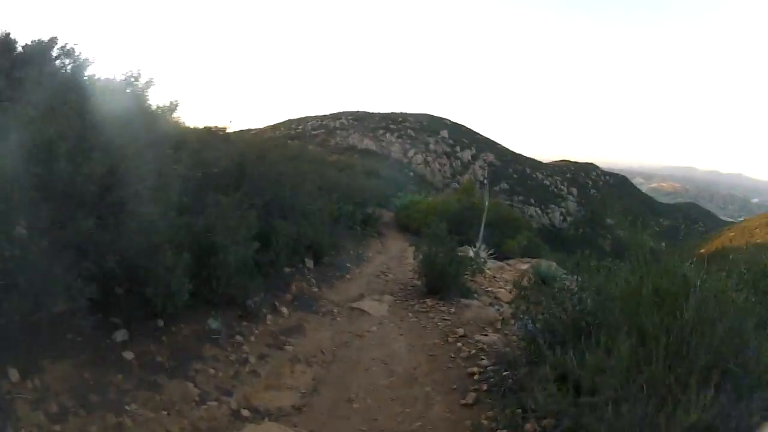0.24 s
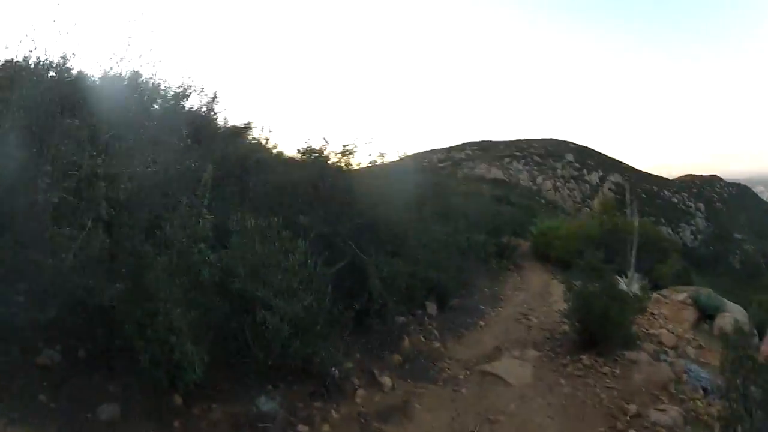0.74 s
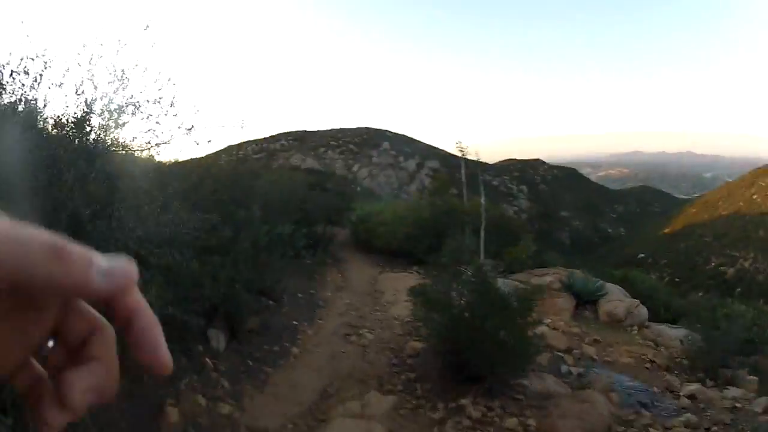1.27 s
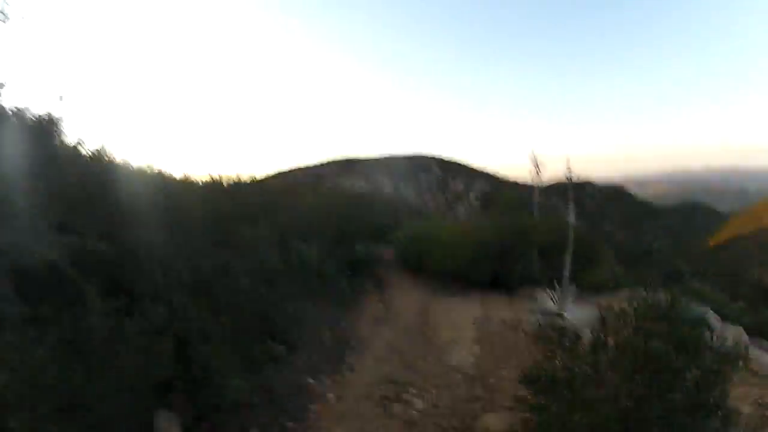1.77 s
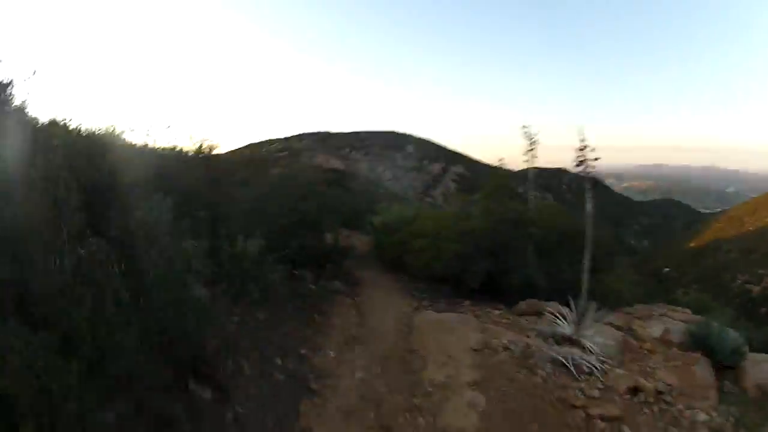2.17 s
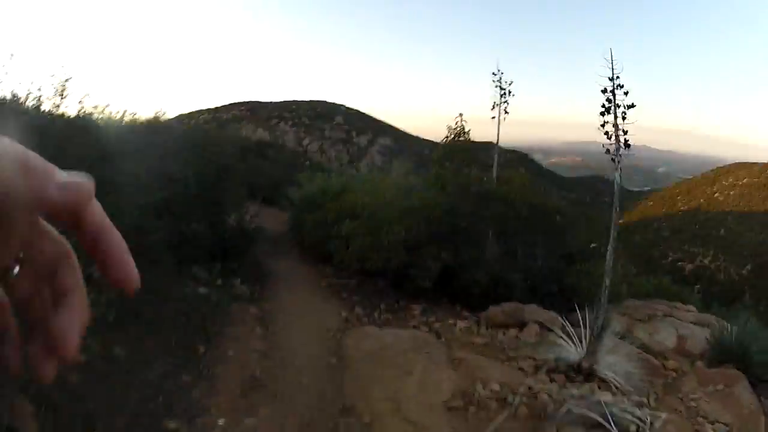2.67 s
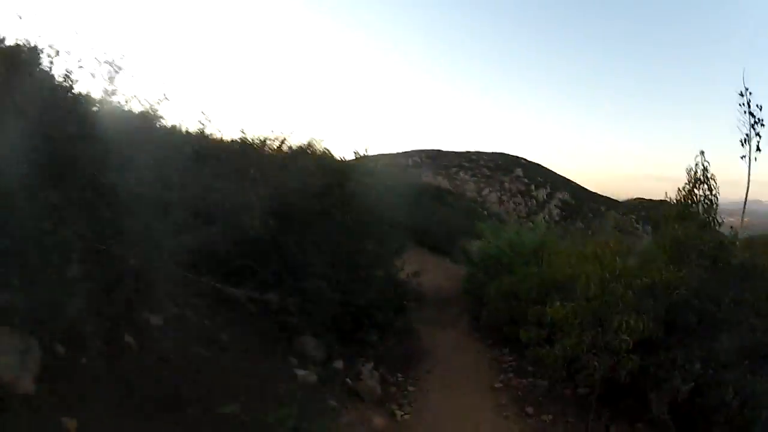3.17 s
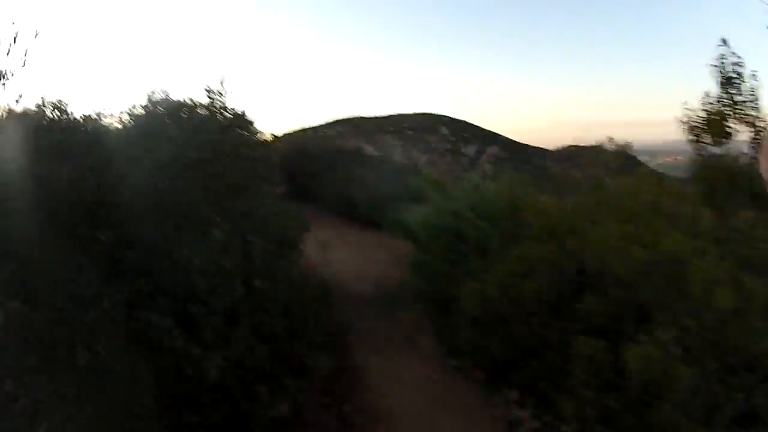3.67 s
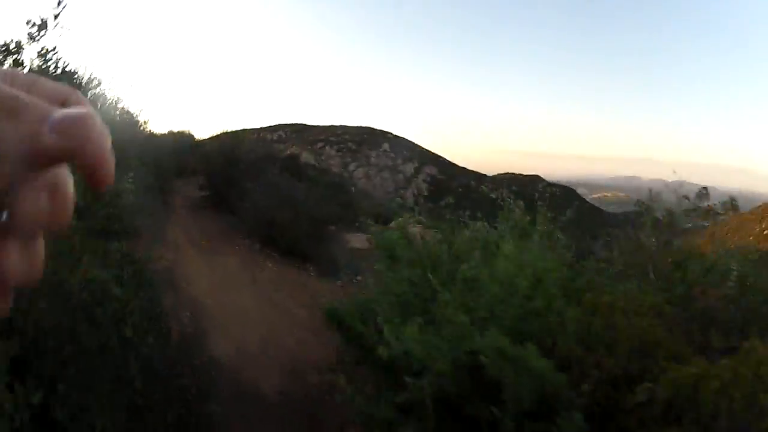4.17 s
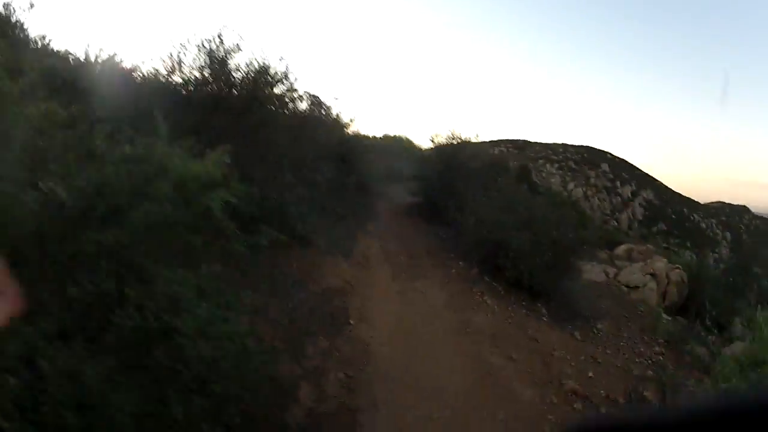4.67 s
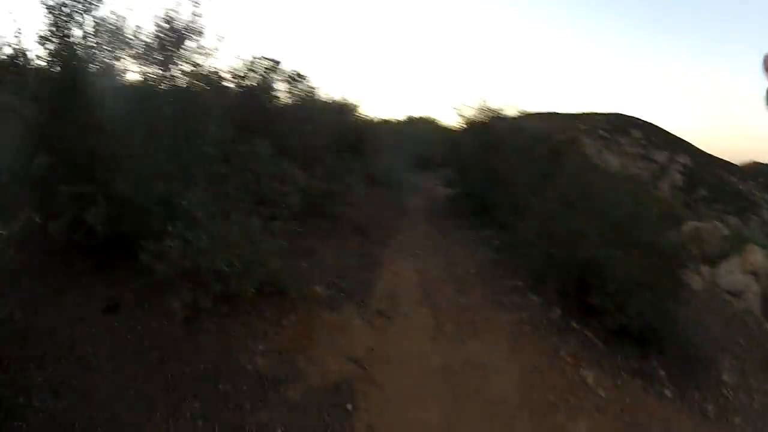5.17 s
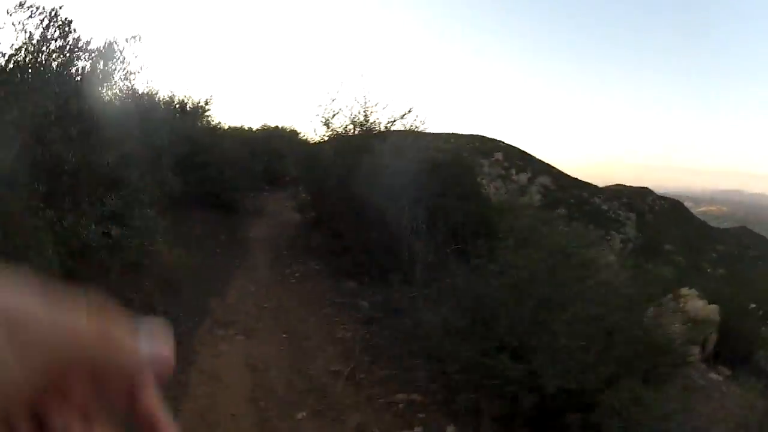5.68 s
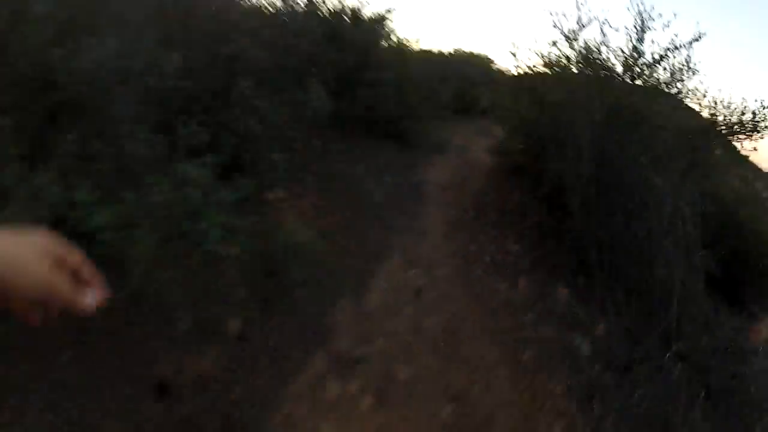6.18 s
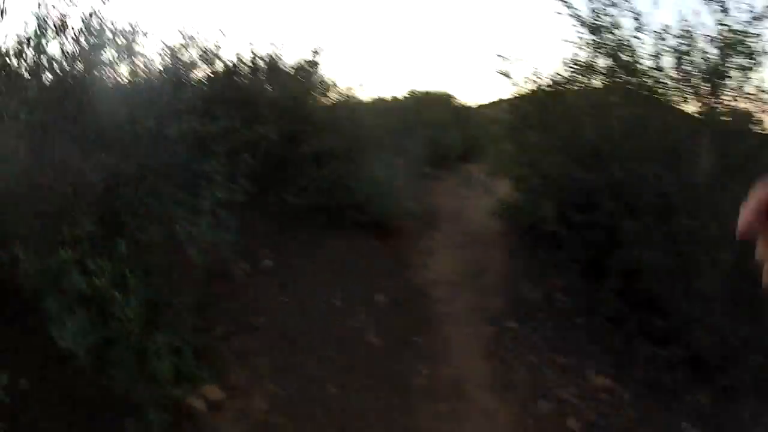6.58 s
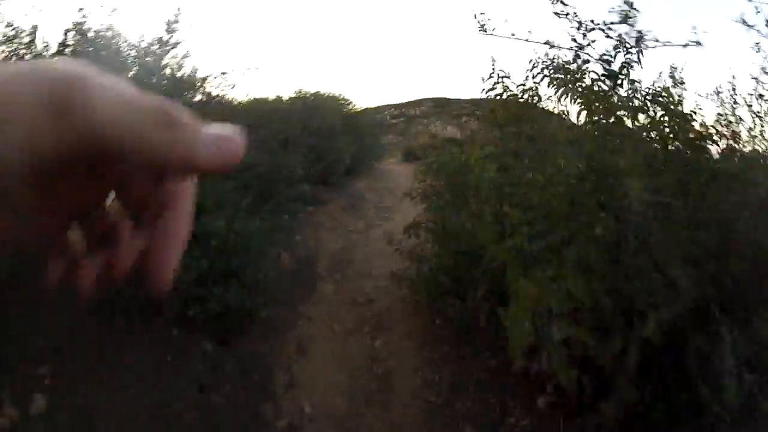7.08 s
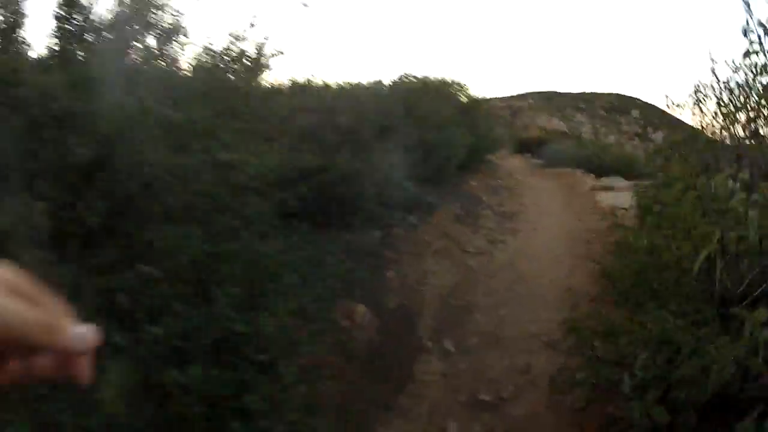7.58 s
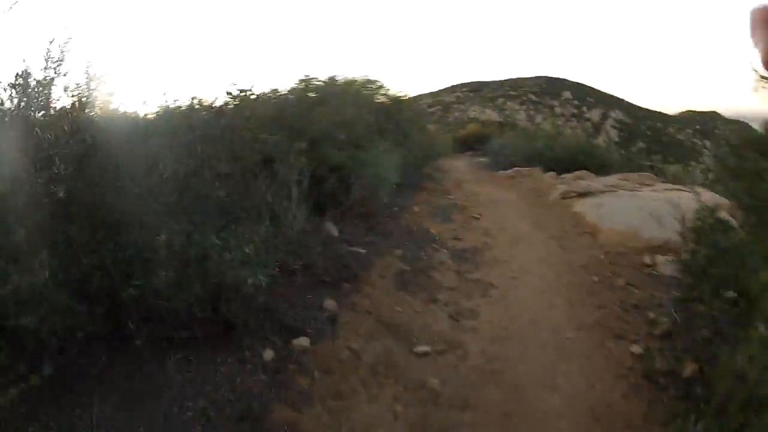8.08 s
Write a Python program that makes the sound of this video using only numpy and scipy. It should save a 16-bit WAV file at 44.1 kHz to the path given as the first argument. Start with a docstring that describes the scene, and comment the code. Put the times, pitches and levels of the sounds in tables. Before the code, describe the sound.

A person runs on a dirt trail, heard very close from a chest-worn camera in a plastic case. From the start, dull footfalls thud at nearly three a second over a low rumble of moving air. Small kicked stones chink with most steps, and a shirt scrapes over the case in short hissing strokes, squeaking faintly around 0.6 seconds. At about 1.1 seconds the case knocks hard, followed by a heavy, slightly overloaded bump against the chest. Another bump comes at 2.6 seconds, and a knock and bump near 3.3. From 4.5 seconds the steps soften, and sharp plastic knocks land at about 4.7, 5.8, 6.2 and 7.6 seconds. The shirt squeaks briefly on about every second step, near 5.2, 6, 6.7, 7.4 and 8.1 seconds. The running continues to the end, just past 8 seconds, with a coarse, gritty sound throughout.

```python
"""A runner on a dirt trail, heard by a camera worn on the chest in a plastic case.
From the start, over a low rumble, each stride thuds through the body, kicks up chinking grit and drags
the shirt over the case with a hiss and one early squeak. Just after 1 s comes the first hard knock of
the case on its mount and a bump against the chest; the loudest hits overload the coarse recorder.
From about 4.5 s the steps soften, knocks come more often and the shirt squeaks about every second step."""
import sys
import numpy as np
from scipy import signal
from scipy.fft import rfft, irfft
from scipy.io import wavfile
from scipy.ndimage import uniform_filter1d

SR = 44100
rng = np.random.default_rng(int(sys.argv[2]) if len(sys.argv) > 2 else 0)


def generate_wav(signal):
    """Clip the signal to [-1, 1] and save it as 16-bit WAV at the path in sys.argv[1]."""
    frames = np.transpose(np.atleast_2d(signal))
    scaled = np.clip(frames, -1, 1) * 32767
    pcm = np.round(scaled).astype(np.int16)
    wavfile.write(sys.argv[1], SR, pcm)


N = 367353
TIME = np.arange(N) / SR


def undb(db):
    """Turn decibels into a number to multiply by."""
    return 10 ** (np.asarray(db) / 20)


def unit(x):
    """Scale a sound so that its average power is 1."""
    return x / np.sqrt(np.mean(x ** 2))


def add(track, start_s, sound):
    """Mix a sound into the track at a given time."""
    i = max(int(round(start_s * SR)), 0)
    track[i:i + len(sound)] += sound[:max(N - i, 0)]


def colour(x, points):
    """Shape the bass and treble along a curve of (pitch_hz, level_db) points."""
    hz, db = np.transpose(points)
    bin_hz = np.maximum(np.arange(len(x) // 2 + 1) * SR / len(x), 1)
    return irfft(rfft(x) * undb(np.interp(np.log(bin_hz), np.log(hz), db)), len(x))


def resonate(x, hz, width_hz):
    """Make a sound ring at one pitch; a narrower width rings longer."""
    return signal.lfilter(*signal.iirpeak(hz, hz / width_hz, fs=SR), x)


def lowpass(x, hz, order):
    """Turn down the treble above hz; a higher order cuts more steeply."""
    return signal.sosfilt(signal.butter(order, hz, fs=SR, output="sos"), x)


def wander(rate_hz):
    """A smooth random wobble of typical size 1 that changes about rate_hz times a second."""
    hold = int(SR / rate_hz)
    stairs = np.repeat(rng.standard_normal(N // hold + 1), hold)
    return unit(uniform_filter1d(stairs, hold)[:N])


def hiss(level_db=-65):
    """The recorder's own steady hiss."""
    return undb(level_db) * rng.standard_normal(N)


# The tone of the rumble: pitch_hz, level_db
RUMBLE_TONE = [(12, -4.5), (25, 4), (50, -7), (100, -7), (200, -8.5), (280, -16), (400, -28), (1000, -65),
               (3000, -60), (6000, -36.5)]
def rumble(rub_db, level_db=-38.0, flicker_db=2, follow=0.47, fade_db_per_s=-0.18,
           sway_db=5, sway_lag_s=0.042, sway_s=0.14):
    """Moving air and the swaying harness rumble, swelling round each landing and as the shirt moves."""
    sway = sum(np.exp(-((TIME - s - sway_lag_s) / sway_s) ** 2) for s, _, _ in STEPS)
    motion_db = follow * rub_db + sway_db * sway + fade_db_per_s * TIME
    noise = unit(colour(rng.standard_normal(N), RUMBLE_TONE))
    return noise * undb(level_db + motion_db - motion_db.mean() + flicker_db * wander(25))


# The tone of one chink: pitch_hz, level_db
CHINK_TONE = [(500, -11.5), (2000, -14), (3600, -11), (4250, -6), (4700, -4), (5200, -9), (6000, -4.5)]
# A shoe kicks a stone: start_s, relative_level_db (of its first chink)
STONES = [(0.098, -45), (0.338, -39), (0.735, -25.5), (1.176, -26.5), (1.283, -35), (1.3428, -33),
          (1.5392, -23), (1.9055, -25), (2.1727, -35.5), (2.2502, -22), (2.6218, -18), (2.711, -31),
          (3.016, -21), (3.3892, -23), (3.749, -25.5), (4.114, -25), (4.501, -28.5), (4.848, -25),
          (5.1722, -37), (5.584, -33), (5.941, -29), (6.667, -26.5), (6.965, -29), (7.042, -29),
          (7.174, -43.5)]
def grit(rise_s=0.00047, decay_s=0.0051, grain_db=2.0, gain_db=-2,
         skip_s=0.037, skip_db=-9.5, skip_scatter=0.26, crumb_count=36):
    """Kicked stones chink three times as they skip, softer each time; crumbs land faintly in between."""
    out, t = np.zeros(N), np.arange(SR // 16) / SR
    grains = rng.standard_normal(N) * undb(grain_db * wander(760))
    fade = (1 - np.exp(-t / rise_s)) * np.exp(-t / decay_s)
    fade_level = np.sqrt(np.mean(fade ** 2)) / fade.max()
    chinks = [(when * N / SR, -62 + 16 * size) for when, size in rng.random((crumb_count, 2))]
    for start_s, db in STONES:
        for skip, chance in enumerate(rng.standard_normal(3)):
            delay_s = skip * skip_s * (1 + skip_scatter * chance)
            chinks.append((start_s + delay_s, db + skip * skip_db))
    for start_s, db in chinks:
        burst = np.roll(grains, -int(start_s * SR))[:len(t)] * fade
        add(out, start_s, undb(db + gain_db) * fade_level * unit(colour(burst, CHINK_TONE)))
    return out


# The tones of the deep thud and of the body's shudder: pitch_hz, level_db
THUD_TONE = [(10, -2), (25, 6.5), (45, -4.5), (80, -3), (120, -16), (200, -63), (400, -50), (2000, -100)]
SHUDDER_TONE = [(30, -37), (60, -11), (120, -2.5), (200, -1), (280, -4.5), (400, -24), (800, -41),
                (3000, -100)]
# A foot lands: middle_s, thud_db, relative_shudder_db
STEPS = [(0.211, -30, -61), (0.708, -25, -55), (1.152, -20, -22.5), (1.512, -23, -37),
         (1.897, -23.5, -28.5), (2.268, -25.5, -47), (2.609, -22, -26), (2.98, -24, -36), (3.372, -23, -37),
         (3.73, -24.5, -38), (4.09, -24, -32), (4.411, -29.5, -51), (4.88, -30, -47), (5.169, -31, -38),
         (5.508, -34, -38.5), (5.891, -27, -43), (6.229, -26.5, -35.5), (6.621, -29.5, -40.5),
         (7.031, -32, -37), (7.319, -36, -46), (7.732, -44, -36.5), (8.078, -33, -47)]
def footfalls(thud_s=0.048, shudder_s=0.041, shudder_gain_db=-2):
    """Each landing reaches the camera through the body as a dull swell with a shorter shudder on top."""
    out, half_s = np.zeros(N), 0.2
    t = np.arange(int(2 * half_s * SR)) / SR - half_s
    for middle_s, thud_db, shudder_db in STEPS:
        layers = (THUD_TONE, thud_db, thud_s), (SHUDDER_TONE, shudder_db + shudder_gain_db, shudder_s)
        for tone, db, width_s in layers:
            swell = np.exp(-(t / width_s) ** 2 / 2)
            burst = swell * colour(rng.standard_normal(len(t)), tone)
            add(out, middle_s - half_s, undb(db) * unit(burst) * np.sqrt(np.mean(swell ** 2)))
    return out


# The notes at which the plastic case rings: pitch_hz, width_hz, level_db
CASE_NOTES = [(622, 315, -0.5), (1100, 320, 1), (1909, 435, 0.5), (2585, 320, -8.5), (3478, 563, -11),
              (4500, 2900, -76)]
def case(force, low_hz=0, high_hz=SR):
    """A push rings the case's notes between two pitches; neighbouring notes swing opposite ways."""
    out = np.zeros(len(force))
    for k, (hz, width_hz, db) in enumerate(CASE_NOTES):
        if low_hz <= hz < high_hz:
            ring = resonate(resonate(force, hz, width_hz), hz, width_hz)  # twice, for a sharper note
            out += (-1) ** k * undb(db) * ring
    return out


# The camera bumps against the chest: middle_s, level_db, pitch_hz
BUMPS = [(1.174, 4.5, 106), (1.491, -12.5, 75), (2.593, -10.5, 94), (2.624, -1.5, 107), (2.889, -25.5, 205),
         (3.379, -8, 143), (5.073, -18, 180), (6.136, -23.5, 201), (7.637, -14, 189)]
def bumps(cycles=0.42, rattle_db=-30, rattle_s=0.0027):
    """A padded blow: one heavy swing of pressure that rattles the case a little."""
    out, half_s = np.zeros(N), 0.05
    t = np.arange(int(2 * half_s * SR)) / SR - half_s
    for middle_s, db, hz in BUMPS:
        swing = -np.sin(2 * np.pi * hz * t + 0.5) / np.cosh(2 * hz * t / cycles)
        rattle = unit(case(rng.standard_normal(len(t)))) / np.cosh(t / rattle_s)
        add(out, middle_s - half_s, undb(db) * (swing + undb(rattle_db) * rattle))
    return out


# The case strikes its mount: start_s, level_db, ring_hz, ring_width_hz, chatter_s, shove_db, shove_hz
KNOCKS = [(1.048, -41.5, 1910, 900, 0.003, -25, 300), (1.1163, -13, 2460, 1000, 0.0018, -4.5, 244),
          (2.504, -43.5, 2520, 900, 0.002, -17, 300), (3.3099, -10, 980, 452, 0.0024, -2, 443),
          (4.7301, -4.5, 1130, 323, 0.0026, -6, 250), (4.7411, -17, 2330, 198, 0.003, -11, 297),
          (5.818, -6, 1730, 388, 0.00099, -7.5, 308), (5.822, -18.5, 723, 40, 0.0032, -22, 250),
          (6.1766, -26, 1760, 593, 0.006, 1, 407), (6.1846, -16, 1860, 364, 0.0037, -11, 456),
          (6.2079, -12, 1930, 586, 0.0024, 0.5, 277), (7.603, -3.5, 1790, 249, 0.0029, -14, 255)]
def knocks(contact_db=2, crack_db=-23, crack_hz=3400, shove_cycles=0.5, first_hit=5.0):
    """Plastic hits plastic, chatters for a few milliseconds and shoves the whole case."""
    out, t = np.zeros(N), np.arange(SR // 10) / SR
    per_10_ms = np.sqrt(SR / 100 / len(t))  # levels count as if the knock were packed into 10 ms
    for start_s, db, ring_hz, width_hz, chatter_s, shove_db, shove_hz in KNOCKS:
        force = rng.standard_normal(len(t)) * np.exp(-t / chatter_s)
        force[0] = -first_hit
        crack = undb(crack_db) * lowpass(force, crack_hz, order=4)
        # the spot that is hit adds a ring of its own
        contact = undb(contact_db) * unit(resonate(force, ring_hz, width_hz))
        ring = unit(case(force) + crack) + contact
        shove = -np.sin(2 * np.pi * shove_hz * t) * np.exp(-shove_hz * t / shove_cycles)
        add(out, start_s, undb(db) * per_10_ms * (unit(ring) + undb(shove_db) * unit(shove)))
    return out


# Between strokes the cloth only creeps: time_s, level_db
CREEP = [(0.1, -56), (3.3, -52.5), (6.4, -51.5), (8.3, -48.5)]
# The shirt slides over the case: start_s, length_s, level_db, pressure_db (low notes against high ones)
STROKES = [(0.0, 0.053, -43.5, -8), (0.238, 0.016, -40.5, -2), (0.403, 0.265, -42, -8.5),
           (0.675, 0.025, -32, -8), (0.71, 0.07, -46, -10), (0.773, 0.11, -38.5, -5.5),
           (0.892, 0.076, -32, -10), (1.096, 0.092, -31.5, -4.0), (1.18, 0.17, -38.5, -4.5),
           (1.449, 0.057, -37.5, -5), (1.537, 0.2, -38.5, -5.5), (1.842, 0.027, -30, -3.5),
           (1.87, 0.2, -40.5, -6), (2.22, 0.022, -36.5, -7), (2.323, 0.14, -34.5, -5.5),
           (2.529, 0.12, -36, -3), (2.648, 0.18, -39.0, -5.5), (2.926, 0.049, -35, -6.5),
           (2.998, 0.17, -37, -4.5), (3.305, 0.15, -37, -2), (3.433, 0.15, -45, -8.5),
           (3.671, 0.038, -35, -5.5), (3.759, 0.048, -29.5, -2.5), (3.835, 0.068, -34.5, -8),
           (3.938, 0.337, -44.5, -4.5), (4.041, 0.15, -35.5, -2.5), (4.38, 0.042, -39.5, -11),
           (4.47, 0.052, -30, -0.5), (4.518, 0.11, -45, -4.5), (4.833, 0.08, -33, -1.5),
           (4.946, 0.025, -35, -7), (5.105, 0.056, -34.5, -4.5), (5.207, 0.056, -27.5, -2.5),
           (5.488, 0.11, -31.5, -3), (5.605, 0.13, -43, -6.5), (5.878, 0.019, -34, -11),
           (5.93, 0.065, -27, 3), (6.023, 0.056, -40, -7.5), (6.209, 0.17, -36, -3.0),
           (6.577, 0.021, -35, -7.5), (6.644, 0.058, -27, 0.5), (6.937, 0.16, -33.5, -3.5),
           (7.275, 0.064, -36, -7.5), (7.372, 0.05, -24, -0.5), (7.711, 0.099, -33, -1),
           (8.101, 0.058, -26, -0.5)]
def sliding(rise_s=0.01, fall_s=0.0069, creep_pressure_db=-8):
    """How loud and how hard the shirt rubs, in dB: each stroke gathers speed, holds and stops."""
    power = undb(np.interp(TIME, *np.transpose(CREEP))) ** 2
    pressed = power * undb(creep_pressure_db) ** 2
    for start_s, length_s, db, pressure_db in STROKES:
        rise = (1 + np.tanh((TIME - start_s) / rise_s / 2)) / 2
        fall = (1 + np.tanh((start_s + length_s - TIME) / fall_s / 2)) / 2
        stroke = (undb(db) * rise * fall) ** 2
        power += stroke
        pressed += stroke * undb(pressure_db) ** 2
    return 10 * np.log10(power), 10 * np.log10(pressed / power)


# The weave catches and squeaks: middle_s, half_length_s, top_pitch_hz, squeak_over_hiss_db
SQUEAKS = [(0.6, .24, 2320, -5), (4.506, 0.038, 1152, -15), (5.24, 0.051, 1120, -1),
           (5.954, .04, 1259, 0.5), (6.675, 0.038, 969, 2), (7.397, 0.04, 1036, 3),
           (7.762, 0.16, 644, -6.5), (8.121, 0.047, 957, 5.5)]
def friction(grain_db=2.5, pitch_droop=0.55, pitch_jitter=0.075, fade_curve=0.31):
    """Fibres slip at random; on firm strokes they slip in step and squeak, higher as they slide faster."""
    force = unit(rng.standard_normal(N) * undb(grain_db * wander(1200)))
    waver = 1 + pitch_jitter * wander(300)
    for middle_s, half_s, top_hz, squeak_db in SQUEAKS:
        on = np.abs(TIME - middle_s) < half_s
        position = (TIME[on] - middle_s) / half_s  # runs from -1 to 1 through the squeak
        pitch_hz = top_hz * (1 - pitch_droop * position ** 2) * waver[on]
        phase = 2 * np.pi * np.cumsum(pitch_hz) / SR
        slips = np.sqrt(4 * top_hz / SR) * sum(np.cos(k * phase) / k for k in range(1, 4))
        share = undb(squeak_db) * (1 - position ** 2) ** fade_curve
        force[on] = (force[on] + share * slips) / np.sqrt(1 + share ** 2)
    return force


def shirt(rub_db, pressure_db, flutter_db=1.21, snag_db=2.1, soft_hz=3850, split_hz=1500, fibre_db=-25):
    """Cloth rubs the case, snagging and letting go; pressing harder brings out the case's low notes."""
    force = friction() * undb(flutter_db * wander(70) + snag_db * wander(30))
    soft_force = lowpass(force, soft_hz, order=28)
    low_notes = unit(case(soft_force, high_hz=split_hz))
    high_notes = unit(case(soft_force, low_hz=split_hz))
    return undb(rub_db) * (high_notes + undb(pressure_db) * low_notes + undb(fibre_db) * force)


def scene():
    """All the sounds reach one microphone, the same on the left and the right."""
    rub_db, pressure_db = sliding()
    mono = shirt(rub_db, pressure_db) + footfalls() + bumps() + knocks() + grit() + rumble(rub_db) + hiss()
    return np.array([mono, mono])


def record(dry, recorder_hz=12000, input_top_hz=5750, output_top_hz=15300, clip_level=0.97):
    """The recorder samples slowly, chops off loud peaks and holds each sample, adding a gritty treble."""
    dulled = signal.sosfiltfilt(signal.butter(10, input_top_hz, fs=SR, output="sos"), dry)
    coarse = signal.resample_poly(dulled, recorder_hz, SR, axis=1)
    clipped = np.clip(coarse, -clip_level, clip_level)
    stairs = np.repeat(clipped, 4, axis=1)  # holding mirrors the middle pitches up into the treble
    held = signal.resample_poly(stairs, SR, 4 * recorder_hz, axis=1)[:, :N]
    return signal.sosfiltfilt(signal.ellip(8, 0.1, 50, output_top_hz, fs=SR, output="sos"), held)


dry = scene()
out = record(dry)
generate_wav(out)
```